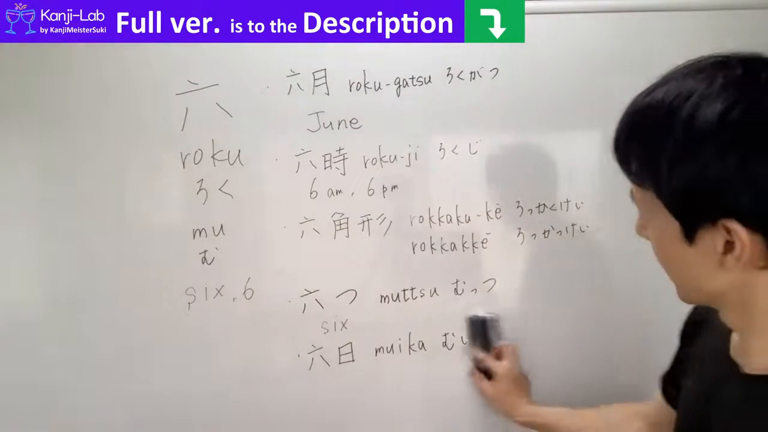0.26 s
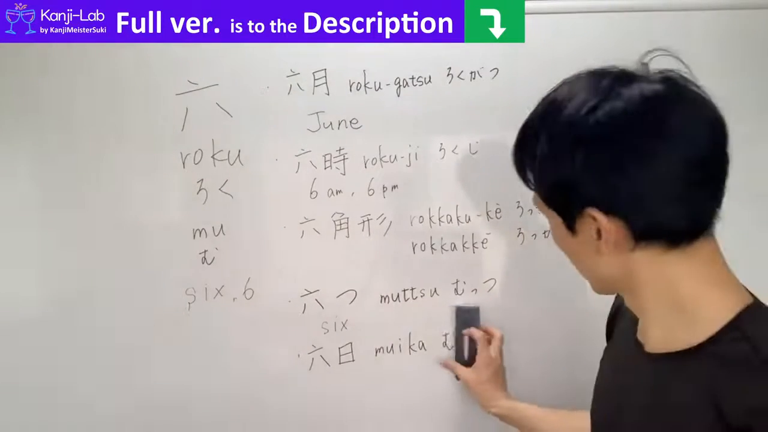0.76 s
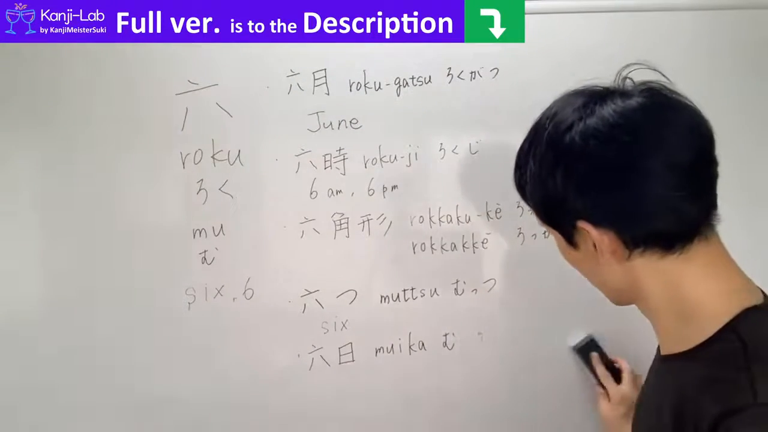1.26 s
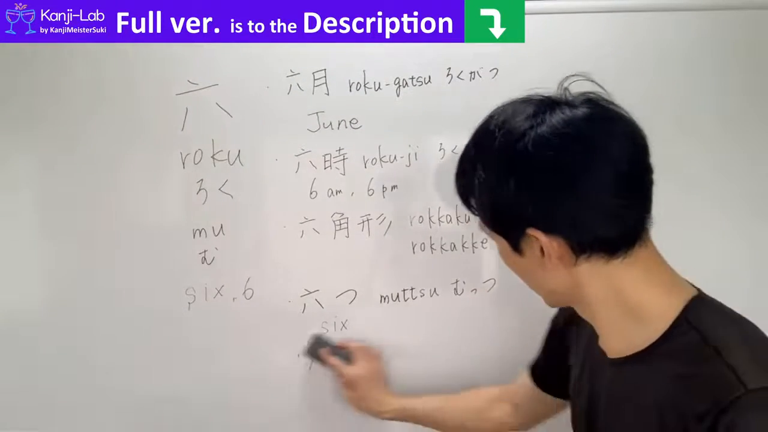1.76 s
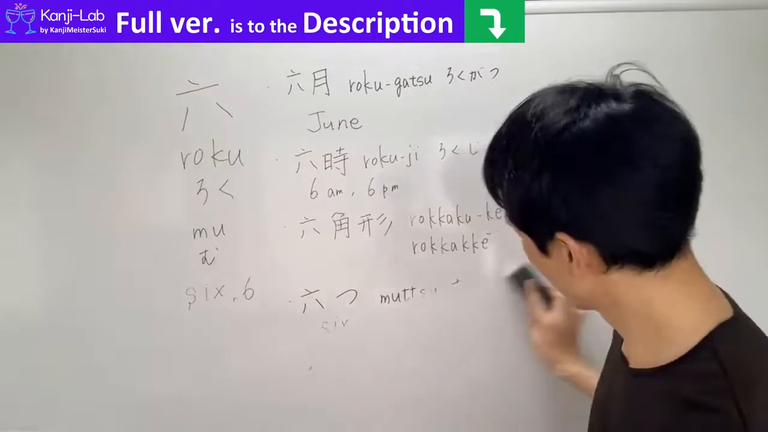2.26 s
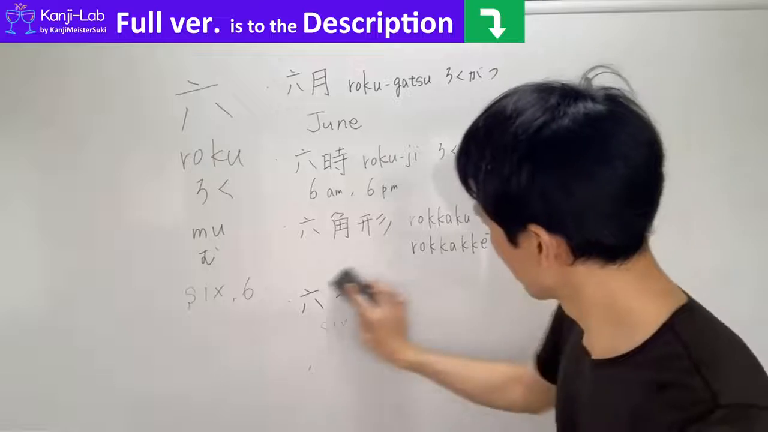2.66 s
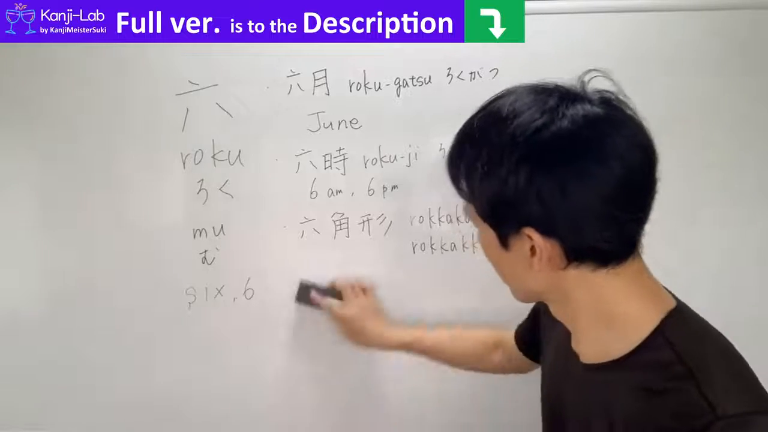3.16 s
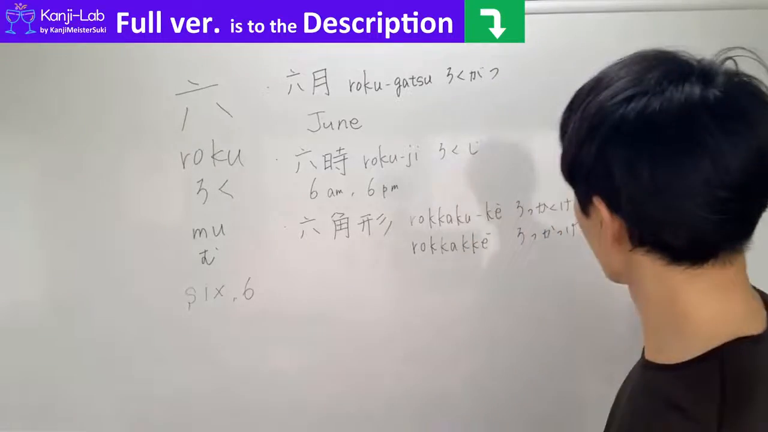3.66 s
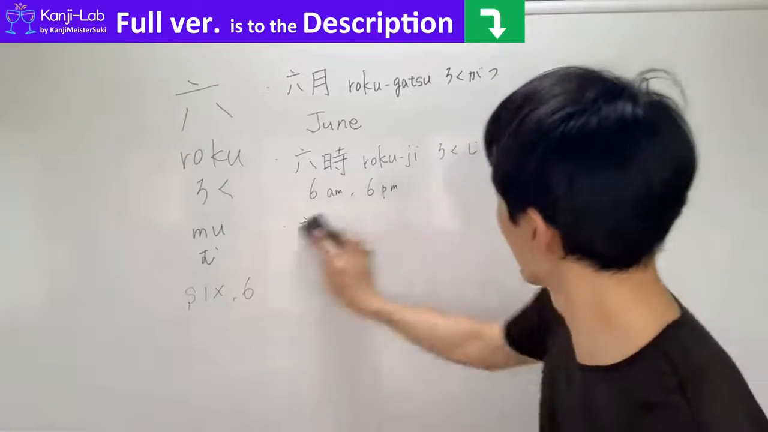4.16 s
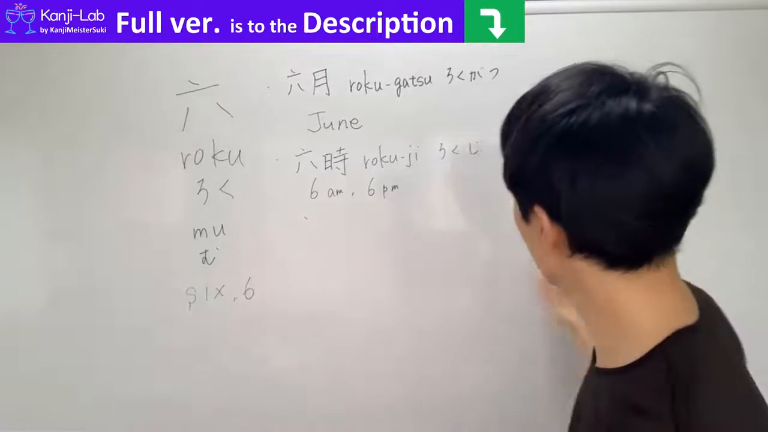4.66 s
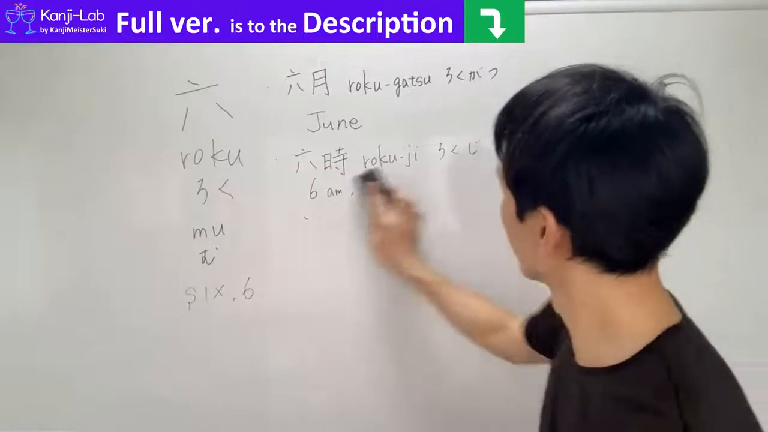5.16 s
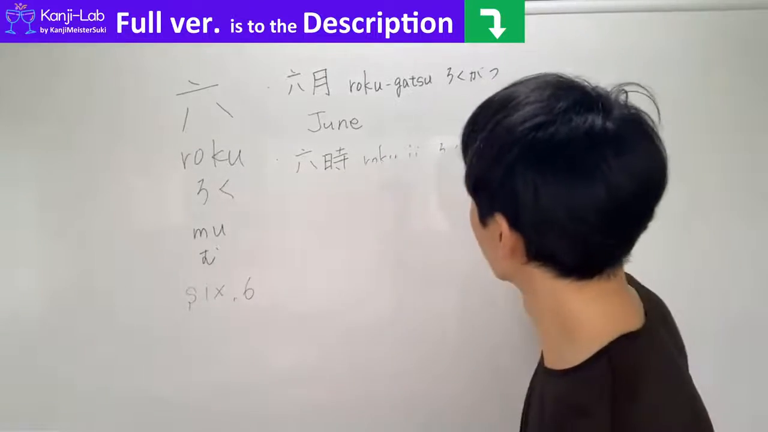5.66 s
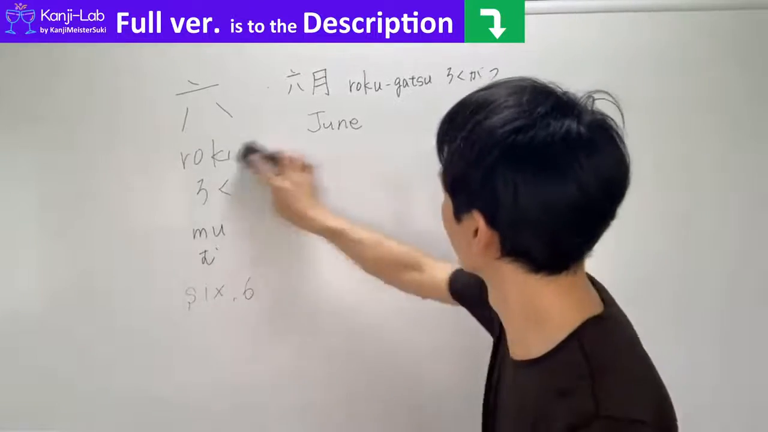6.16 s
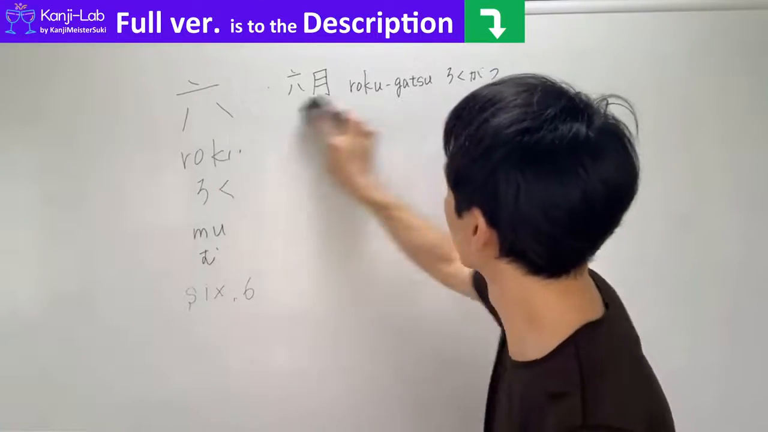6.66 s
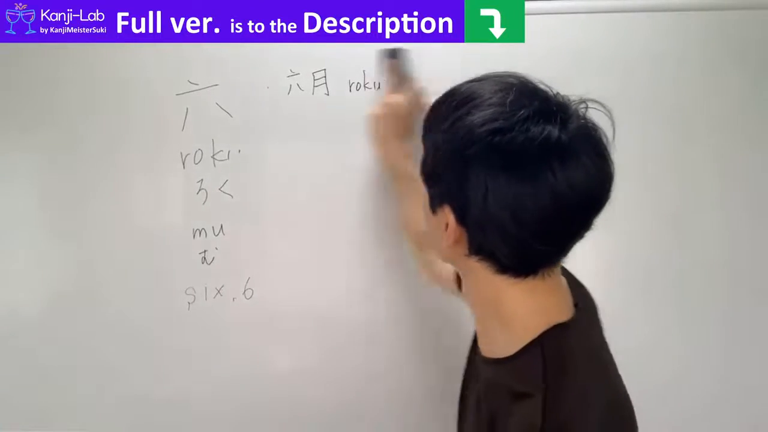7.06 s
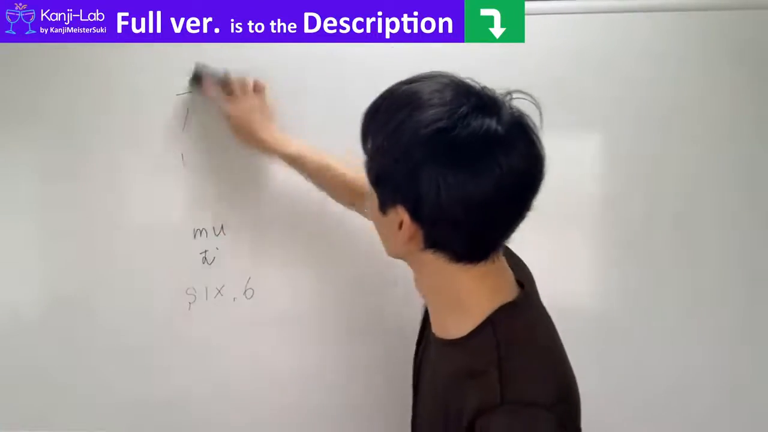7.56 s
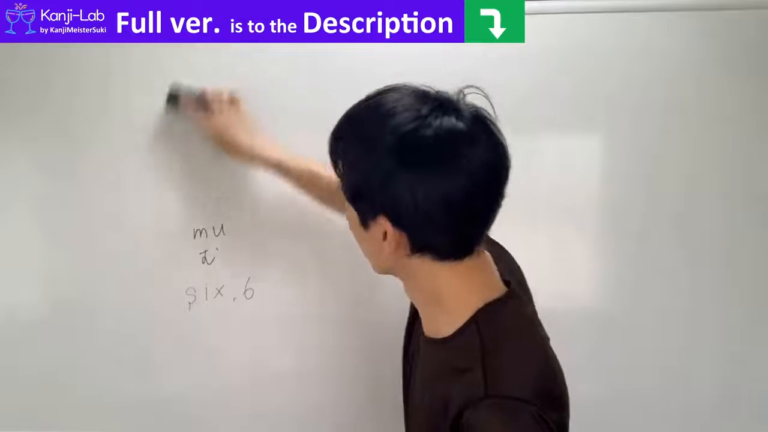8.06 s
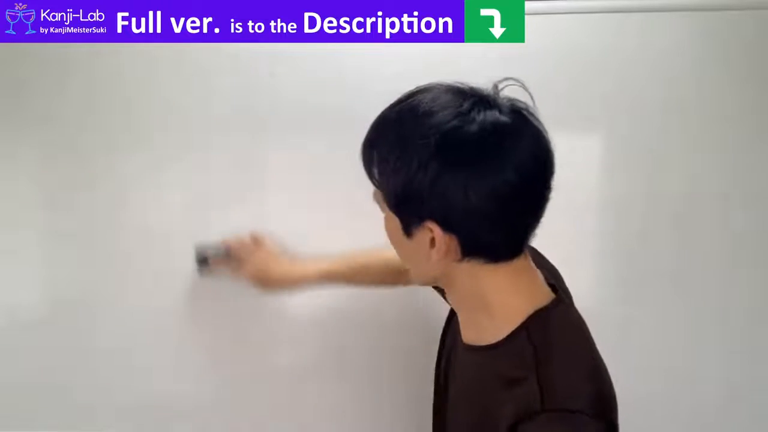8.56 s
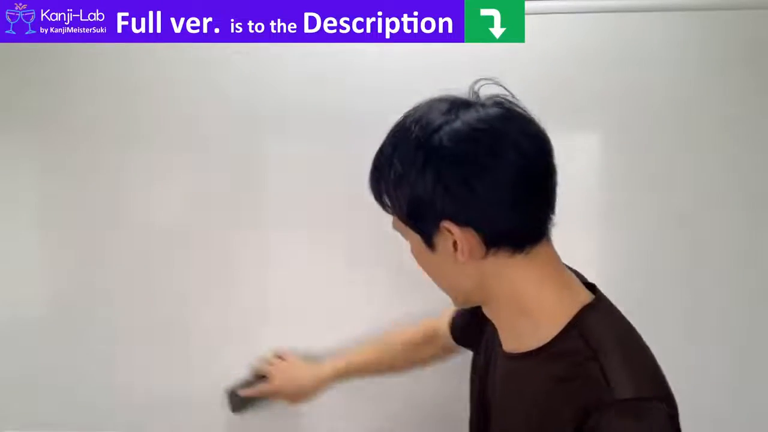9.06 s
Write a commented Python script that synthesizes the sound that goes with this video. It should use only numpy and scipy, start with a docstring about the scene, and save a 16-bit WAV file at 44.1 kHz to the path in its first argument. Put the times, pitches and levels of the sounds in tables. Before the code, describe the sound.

An eraser bumps onto a whiteboard and wipes it in repeated hollow, scratchy strokes, knocking lightly as it turns.

```python
"""A small classroom: a felt eraser is bumped onto a wall whiteboard and rubbed to and fro.
Fibre slips rumble, scrape and hiss; the panel booms under the hand. Where a stroke turns, the block
catches, judders and knocks the board into ringing; the hardest bump also thuds. The plastic shell
clicks, and stick-slip gives three short squeaks, the last very faint. Everything arrives twice,
2.5 ms apart, which gives a hollow, combed colour."""
import sys
import numpy as np
from scipy import signal
from scipy.fft import rfft, irfft
from scipy.io import wavfile

SR = 44100
rng = np.random.default_rng(int(sys.argv[2]) if len(sys.argv) > 2 else 0)


def store_wav(level_fs):
    """Save 16-bit WAV to argv[1]."""
    pcm = np.round(np.clip(np.atleast_2d(level_fs), -1, 1) * 32767)
    wavfile.write(sys.argv[1], SR, pcm.T.astype(np.int16))


N = 410130
TIME_S = np.arange(N) / SR
BIN_HZ = np.arange(N // 2 + 1) * SR / N

# Felt on the board. Each row: start in seconds, end in seconds, level in dB.
FELT_CONTACTS = [(-.1, 0.832, 1), (1.23, 9.085, 0)]
# Strokes. Each row: crest in seconds, half length in seconds, effort in dB, brightness in dB.
HAND_STROKES = [(0.158, 0.094, 4, -3), (0.412, 0.08, 8, -4.5), (0.773, 0.041, 4.5, 1.5),
                (1.55, 0.33, 3.5, 0), (2.3, 0.18, 1.5, -0.5), (2.68, 0.19, 7.5, -1),
                (3.026, 0.068, 4.5, -1), (3.36, 0.085, -2.5, 0), (3.558, 0.056, 2, -0.5),
                (4.08, 0.21, 6.5, -1.5), (4.603, 0.16, 0, -1), (5.277, 0.41, 4.5, -1), (5.97, 0.13, 4.5, 0),
                (6.27, 0.047, 3, -1.5), (6.7, 0.29, 1.5, -1), (7.114, 0.074, 5, -4.5),
                (7.38, 0.2, 5.5, 0.5), (7.8, 0.092, 3.5, -1), (8.35, 0.39, 4, -1.5), (8.866, .13, 4, -2.5),
                (9.1, .07, 0.5, 0)]
# Noise spectra. Each row: frequency in Hz, relative density in dB.
RUMBLE_DB = [(120, -34.5), (240, -9.5), (320, -0.5), (420, -1), (510, 7), (620, -3), (900, -20),
             (2000, -44)]
HOLLOW_DB = [(400, -26), (660, -0.5), (780, 2.5), (870, 1), (1000, 1.5), (1170, 0), (1350, 0.5), (1600, -8),
             (2100, -30)]
SCRAPE_DB = [(1000, -22.5), (1600, -0.5), (2000, -1), (2400, -1.5), (2900, -5), (4400, -11), (5500, -13.5),
             (8000, -36.5)]
HISS_DB = [(2500, -18.5), (4500, 4), (6500, 3), (8000, 3.5), (10000, 2.5), (12000, -2.5), (15500, -15)]
BOOM_DB = [(20, -43), (45, -24), (80, -2), (105, 0.5), (122, 12.5), (145, 0), (175, -23), (260, -32)]
AIR_DB = [(20, -29), (110, 6.5), (250, 2.5), (430, 0), (800, -5), (1500, -25.5), (3000, -13.5),
          (6000, -16.5), (10000, -19.5), (15500, -18.5)]
SWISH_DB = [(150, -37.5), (700, 12), (1600, 10), (3000, 6.5), (5000, 1.5), (7000, -5), (9000, -3),
            (12000, -12.5), (15500, -13.5)]
FIZZ_DB = [(3000, -20), (6000, -2.5), (8500, 1), (12000, -2.5), (14000, -6), (15500, -17.5)]
CLICK_DB = [(200, -25), (900, -0.5), (1800, 13.5), (3000, 1.5), (5300, -3.5), (7000, -12), (10000, -6.5),
            (15500, -17.5)]
# Board modes. Each row: frequency in Hz, level in dB, t60 in seconds.
BOARD_MODES = [(233.7, -2.5, 0.31), (256.4, -18, 0.98), (321.3, -3.5, .25), (370.8, -2.5, 0.28),
               (417.5, 1, 0.32), (480.3, 2, 0.13), (514.1, -2, 0.66), (652, -10.5, 0.3), (719, -9.5, 0.32),
               (780, -1, 0.2), (845, -5, 0.16), (902.4, -3, 0.22), (1070.7, 9, 0.28), (1121, 10, 0.15),
               (1169, 6.5, 0.22), (1233, -7, 0.18), (1317, -8.5, .27), (1472, -20, .2), (1570, -11, 0.31),
               (1954, -3.5, 0.29), (2132, 5.5, 0.15), (2378, -5, 0.24)]
# Stereo image of the noises. Each row: frequency in Hz, left-right correlation from 0 to 1.
STEREO_CORRELATION = [(30, 0.19), (70, 1), (130, 0.93), (300, 0.98), (450, 0.67), (800, 0.92),
                      (2000, 0.8635), (5000, 0.84), (9500, 0.87), (11500, 1)]
# The hand leans in. Each row: start in seconds, level in dB, hold in seconds.
PANEL_FLEXES = [(0.57, -52, 0.036), (0.803, -56, 0.074), (3.162, -57, 0.091), (4.83, -52, 0.055),
                (5.22, -50.5, 0.13), (6.105, -58, 0.058), (7.483, -48, 0.062), (7.905, -58, 0.13),
                (8.223, -58, 0.15), (8.495, -52.5, 0.14)]
# Quick brushes. Each row: crest in seconds, body in dB, fizz in dB, rise and fall in seconds.
FELT_SWISHES = [(.275, -34.5, -44, 0.028, 0.015), (0.31, -27, -36.5, 0.012, 0.056),
                (.375, -40, -55, .02, 0.033), (0.438, -37, -42, 0.003, 0.029),
                (.48, -42.5, -59, 0.021, 0.031), (0.584, -44.5, -72, 0.0063, 0.045),
                (.785, -45, -66, 0.043, 0.029), (4.825, -47, -50.5, 0.026, 0.03),
                (4.925, -40.5, -47.5, 0.063, 0.028), (5.10, -50, -58, 0.021, 0.03),
                (7.073, -47, -44, 0.024, 0.0224), (7.13, -54, -55.5, 0.034, 0.1),
                (8.24, -47, -59, 0.067, 0.067)]
# The block catches. Each row: start in seconds, level in dB, tilt in dB per octave, judder in dB,
# judder in Hz, rebound delay in seconds, rebound in dB against the knock, rebound judder in Hz.
BLOCK_KNOCKS = [(.254, -42, -3, -38, 403, 0.0216, -7, 420),
                (0.2996, -10, -6.5, -5.5, 430, 0.0074, -1.5, 423),
                (.320, -19, -2, -10.5, 782, .028, 0, 416), (.371, -32.5, -2, -24, 505, 0.025, 2.5, 420),
                (.865, -51, 7, -70, 1154, 0.015, -12, 500), (1.223, -34.5, 1, -32, 807, 0.01115, 0, 809),
                (1.267, -33, -9, -31.5, 379, .038, -14, 388),
                (1.936, -36.5, -8, -35.5, 482, 0.017, -18, 427),
                (2.372, -30, -1, -34, 426, .009, -0.5, 900), (2.58, -48, 6, -50, 840, 0.057, 1.5, 807),
                (3.167, -33, 1, -30.5, 324, 0.018, 0, 376), (3.208, -39, 2, -35, 407, 0.029, -3, 480),
                (4.383, -37, 2.5, -26, 884, 0.019, -5.5, 835),
                (4.813, -32.5, -5.5, -36, 406, 0.04, -4.5, 479),
                (4.885, -42, -9, -31.5, 495, 0.022, -2, 418), (5.384, -26, 2.5, -29, 375, 0.047, -5.5, 493),
                (5.755, -32, .5, -35, 700, 0.02, -2, 470), (6.093, -30, 1, -30, 746, .02, -7.5, 1092),
                (6.364, -37, 0.5, -28, 823, .009, 0.5, 822), (6.385, -41.5, -6, -35.5, 437, .025, -5, 806),
                (6.571, -26.5, 0, -27.5, 763, .022, -8.5, 1100),
                (6.911, -32, 1, -38.5, 415, 0.017, -1.5, 850),
                (6.953, -39.5, 2.5, -31.5, 504, 0.022, -10, 424),
                (7.438, -37.5, 2.5, -32.5, 499, 0.025, -1, 327),
                (7.876, -42.5, 6, -34.5, 920, 0.0216, -7, 844),
                (8.035, -41.5, -2, -50, 793, 0.024, -11, 410),
                (8.479, -35.5, 2.5, -30, 315, .013, 1.5, 325), (8.682, -32, 1.5, -31, 478, 0.018, -17, 716),
                (8.861, -28.5, 1.5, -28.5, 420, .02, -2.5, 408),
                (8.969, -43.5, 1, -42, 442, 0.023, -14, 416)]
# Bands of the struck board. Each row: low and high edge in Hz, trim in dB, dense-ring t60 in seconds.
BOARD_REGISTERS = [(292, 740, -9, 0.23), (632, 982, -6.5, 0.24), (985, 1630, -7.5, 0.15),
                   (1730, 3420, -18.5, 0.26)]
# Shell clicks. Each row: start in seconds, level in dB, t60 in seconds.
SHELL_CLICKS = [(0.3008, -19.5, 0.035), (0.31, -19, 0.032), (0.4326, -25.5, 0.021), (0.8663, -41, 0.034),
                (7.877, -44, .04), (8.036, -55, .03)]
# Lowest panel mode: level in dB, frequency in Hz, t60 in seconds.
PANEL_THUD = (-21.5, 123, 0.45)
# Squeaks. Each row: start in seconds, level in dB, hold in seconds.
BLOCK_SQUEAKS = [(0.601, -44.5, .02), (0.869, -37.5, 0.047), (9.272, -60, 0.023)]
# Squeak resonances. Each row: frequency in Hz, bandwidth in Hz, level in dB.
BLOCK_MODES = [(488, 10, -4.5), (2020, 58, -2.5), (2260, 69, -1.5), (2460, 200, 3.5), (2700, 89, -6),
               (2870, 51, -6.5), (3980, 54, -12), (4860, 180, -12.5)]
# Second arrival. Each row: frequency in Hz, gain against the first.
ARRIVAL_GAIN = [(200, 0.93), (1000, 0.61), (3000, 1), (7000, 0.8), (15000, .72)]


def from_db(db):
    """Decibels to gain."""
    return 10 ** (np.asarray(db) / 20)


def unit_rms(x):
    """Scale to unit rms."""
    return x / np.sqrt(np.mean(x ** 2) + 1e-20)


def per_bin(curve):
    """Interpolate a curve onto the FFT bins, in log frequency."""
    hz, value = np.transpose(curve)
    return np.interp(np.log(BIN_HZ + 1), np.log(hz), value)


def decay(t, t60_s):
    """Exponential fall, 60 dB in t60_s."""
    return np.exp(-np.log(1000) * t / t60_s)


def add(out, start_s, sound):
    """Mix a sound into out."""
    at = max(0, round(start_s * SR))
    out[..., at:at + sound.shape[-1]] += sound[..., :max(0, N - at)]


def drift(rate_hz):
    """Smooth random wander, unit rms."""
    hop, settle = 40, 2000
    pole = np.exp(-2 * np.pi * rate_hz * hop / SR)
    noise = rng.standard_normal(N // hop + settle + 2)
    slow = signal.lfilter([1], [1, -2 * pole, pole * pole], noise)[settle:]
    return np.interp(np.arange(N) / hop, np.arange(len(slow)), unit_rms(slow))


def radiate(spectrum, force, modes_db=-60):
    """A force through a spectrum and the board's modes, plus diffuse side noise; stereo, unit rms."""
    peaks = sum(1 / (1 + ((BIN_HZ - hz) * t60_s) ** 2 / np.pi) for hz, _, t60_s in BOARD_MODES)
    gain = from_db(per_bin(spectrum)) * np.sqrt(1 + from_db(modes_db) ** 2 * peaks)
    correlation = per_bin(STEREO_CORRELATION)
    mid = irfft(rfft(force) * gain * np.sqrt(1 + correlation), N)
    side = irfft(rfft(rng.standard_normal(N)) * gain * np.sqrt(1 - correlation), N)
    return unit_rms(np.array([mid + side, mid - side]))


def friction(slips_per_s, grip_db, grip_hz):
    """Tiny fibre slips, bunched by the felt's uneven grip."""
    slips = (rng.random(N) < slips_per_s / SR) * rng.standard_normal(N)
    return unit_rms(slips * from_db(grip_db * drift(grip_hz)))


def hand(touch_s=0.074, lift_s=0.039, lifted_db=-10, uneven_db=0.5):
    """Contact, effort and brightness in dB: strokes on top of a slightly uneven pressure."""
    contact = 0
    for start_s, end_s, db in FELT_CONTACTS:
        touch = np.clip((TIME_S - start_s) / touch_s + 1, 0, 1)
        lift = np.exp(-np.clip((TIME_S - end_s) / lift_s, 0, 20))
        contact += from_db(db) * touch * lift
    contact_db = 20 * np.log10(np.maximum(contact, from_db(lifted_db)))
    effort_db, bright_db = uneven_db * drift(rate_hz=8), 0
    for crest_s, half_s, push_db, tone_db in HAND_STROKES:
        swell = np.exp(-np.minimum(((TIME_S - crest_s) / half_s) ** 2, 20))
        effort_db += push_db * swell
        bright_db += tone_db * swell
    return contact_db, effort_db, bright_db


def rubbing():
    """Coarse slips shake the panel and the hollow block; finer ones scrape and hiss."""
    contact_db, effort_db, bright_db = hand()
    rumble = radiate(RUMBLE_DB, friction(slips_per_s=2500, grip_db=1.5, grip_hz=5.6), modes_db=7.5)
    hollow = radiate(HOLLOW_DB, friction(slips_per_s=2500, grip_db=1.8, grip_hz=10), modes_db=8)
    scrape = radiate(SCRAPE_DB, friction(slips_per_s=7000, grip_db=1.02, grip_hz=19), modes_db=0.5)
    hiss = radiate(HISS_DB, friction(slips_per_s=20000, grip_db=0.9, grip_hz=11))
    rumble *= from_db(-58 + 0.67 * effort_db - 0.071 * bright_db)
    hollow *= from_db(-53.5 + 0.73 * effort_db - 1.6 * bright_db)
    scrape *= from_db(-55.5 + effort_db + 0.2 * bright_db)
    hiss *= from_db(-63 + 0.84 * effort_db + bright_db)
    return from_db(contact_db) * (rumble + hollow + scrape + hiss)


def panel_boom(rest_db=-67.5, waver_db=2.5, attack_s=0.0051, t60_s=0.36):
    """The panel gives: a faint wavering boom that swells where the hand leans in."""
    power = from_db(rest_db + waver_db * drift(rate_hz=5)) ** 2
    for start_s, db, hold_s in PANEL_FLEXES:
        t = np.maximum(TIME_S - start_s, 0)
        envelope = (1 - np.exp(-t / attack_s)) * decay(np.clip(t - hold_s, 0, 2 * t60_s), t60_s)
        power += (from_db(db) * envelope) ** 2
    return np.sqrt(power) * radiate(BOOM_DB, rng.standard_normal(N))


def room_air():
    """Quiet steady room noise, coloured by the board's modes."""
    return from_db(-57.5) * radiate(AIR_DB, rng.standard_normal(N), modes_db=8.5)


def swishes():
    """Each brush of the felt swells and dies away; some also fizz at the top, each by its own amount."""
    body_power = fizz_power = 0
    for crest_s, body_db, fizz_db, rise_s, fall_s in FELT_SWISHES:
        from_crest = np.maximum((crest_s - TIME_S) / rise_s, (TIME_S - crest_s) / fall_s)
        swell = np.exp(-2 * np.minimum(from_crest, 20))
        body_power += swell * from_db(body_db) ** 2
        fizz_power += swell * from_db(fizz_db) ** 2
    body = radiate(SWISH_DB, friction(slips_per_s=9000, grip_db=-0.5, grip_hz=80))
    fizz = radiate(FIZZ_DB, friction(slips_per_s=7000, grip_db=2.5, grip_hz=90))
    return np.sqrt(body_power) * body + np.sqrt(fizz_power) * fizz


def blows():
    """Each knock, then its rebound: duller, more judder than ring."""
    for start_s, db, tilt_db_oct, judder_db, judder_hz, delay_s, step_db, rebound_hz in BLOCK_KNOCKS:
        yield start_s, db, tilt_db_oct, judder_db, judder_hz
        rebound_db = db + step_db
        yield start_s + delay_s, rebound_db, tilt_db_oct - 2.5, rebound_db + 2.5, rebound_hz


def board_ring(t, low_hz, high_hz, dense_t60_s, dense_db=-1.5, hand_t60_s=0.66):
    """One register of the struck board: hand-damped modes over dense short ringing."""
    floor_hz = low_hz if low_hz > BOARD_REGISTERS[0][0] else 0   # lowest register takes all deep modes
    in_band = [mode for mode in BOARD_MODES if floor_hz < mode[0] < high_hz]
    hz, mode_db, t60_s = np.array(in_band).T[:, :, None]
    gain = from_db(mode_db + 0.51 * rng.standard_normal(hz.shape))
    phase = 2 * np.pi * rng.random(hz.shape)
    partials = gain * np.sin(2 * np.pi * hz * t + phase) * decay(t, t60_s)
    modes = partials.sum(axis=0) * decay(t, hand_t60_s)
    band = signal.butter(3, [low_hz, high_hz], "band", fs=SR, output="sos")
    dense = signal.sosfilt(band, rng.standard_normal(len(t)) * decay(t, dense_t60_s))
    direct = 1 + decay(t, t60_s=0.016)   # the struck spot sounds before the wave spreads
    ring = (unit_rms(modes) + from_db(dense_db) * unit_rms(dense)) * direct
    return ring / np.std(ring[:SR // 60])


def knocks(judder_s=0.0063, contact_s=0.0013, pivot_hz=760, lift_db=2.5, lift_octaves=0.5):
    """The felt catches and judders for a few cycles; the board rings, louder near the judder's pitch."""
    out, t = np.zeros(N), np.arange(SR // 3) / SR
    swell = t / judder_s * np.exp(1 - t / judder_s)
    for start_s, db, tilt_db_oct, judder_db, judder_hz in blows():
        ring = 0
        for low_hz, high_hz, trim_db, t60_s in BOARD_REGISTERS:
            centre_hz = np.sqrt(low_hz * high_hz)
            nearness = np.exp(-(np.log2(centre_hz / judder_hz) / lift_octaves) ** 2)
            level_db = db + trim_db + lift_db * nearness + tilt_db_oct * np.log2(centre_hz / pivot_hz)
            ring += from_db(level_db) * board_ring(t, low_hz, high_hz, t60_s)
        judder = from_db(judder_db) * swell * np.sin(2 * np.pi * (judder_hz * t + rng.random()))
        add(out, start_s, ring * (1 - np.exp(-t / contact_s)) + judder)
    low_cut = signal.butter(2, 170, "high", fs=SR, output="sos")   # the knocks carry little below about 170 Hz
    return signal.sosfilt(low_cut, out)


def classroom(dry, wet_db=-7.5, t60_s=0.22, build_s=0.0019, wall_hz=4957):
    """Add dull diffuse reflections, different on each side."""
    t = np.arange(SR // 2) / SR
    tail = rng.standard_normal((2, len(t))) * decay(t, t60_s) * (1 - np.exp(-t / build_s))
    tail /= np.sqrt(np.sum(tail[0] ** 2))
    tail = signal.sosfilt(signal.butter(1, wall_hz, fs=SR, output="sos"), tail)
    return dry + from_db(wet_db) * signal.fftconvolve(dry[None], tail, axes=1)[:, :N]


def clicks():
    """The hard plastic shell clicks: instant onset, fast decay."""
    envelope, t = np.zeros(N), np.arange(SR // 8) / SR
    for start_s, db, t60_s in SHELL_CLICKS:
        add(envelope, start_s, from_db(db) * decay(t, t60_s))
    return envelope * radiate(CLICK_DB, rng.standard_normal(N))


def thud(start_s=0.303, attack_s=0.009):
    """The hardest bump drives the panel's lowest mode, with a short dull puff."""
    db, hz, t60_s = PANEL_THUD
    out, t = np.zeros(N), np.arange(SR) / SR
    band = signal.butter(2, [65, 150], "band", fs=SR, output="sos")
    puff = unit_rms(signal.sosfilt(band, rng.standard_normal(SR))) * decay(t, t60_s=0.23)
    mode = np.sin(2 * np.pi * hz * t) * decay(t, t60_s)
    add(out, start_s, from_db(db) * (mode + from_db(-9) * puff) * (1 - np.exp(-t / attack_s)))
    return out


def squeaks(attack_s=0.00153, release_t60_s=0.25):
    """Rough stick-slip sings in narrow resonances of the block."""
    out, t, voice = np.zeros(N), np.arange(SR // 3) / SR, 0
    for hz, width_hz, db in BLOCK_MODES:
        radius = np.exp(-np.pi * width_hz / SR)
        feedback = [1, -2 * radius * np.cos(2 * np.pi * hz / SR), radius * radius]
        resonance = signal.lfilter([1, 0, -1], feedback, rng.standard_normal(SR))[-len(t):]
        voice += from_db(db) * resonance / np.std(resonance[:SR // 10])
    voice /= np.std(voice[:SR // 10])
    for start_s, db, hold_s in BLOCK_SQUEAKS:
        envelope = (1 - np.exp(-t / attack_s)) * decay(np.maximum(t - hold_s, 0), release_t60_s)
        add(out, start_s, from_db(db) * envelope * voice)
    return out


def scene():
    """Eraser and board over room air; only knocks and squeaks reverberate."""
    catches = knocks() + squeaks()
    return room_air() + rubbing() + panel_boom() + swishes() + clicks() + thud() + classroom(catches)


def record(dry, delay_s=111.3 / SR, cutoff_hz=15600):
    """A close, slightly duller second arrival combs the sound; peaks clip; the top is cut."""
    gain = per_bin(ARRIVAL_GAIN)
    comb = (1 + gain * np.exp(-2j * np.pi * BIN_HZ * delay_s)) / np.hypot(1, gain)
    combed = irfft(rfft(dry) * comb, N)
    high_cut = signal.ellip(10, 0.1, 80, cutoff_hz, fs=SR, output="sos")
    return signal.sosfilt(high_cut, np.clip(combed, -1, 1))


dry = scene()
out = record(dry)
store_wav(out)
```